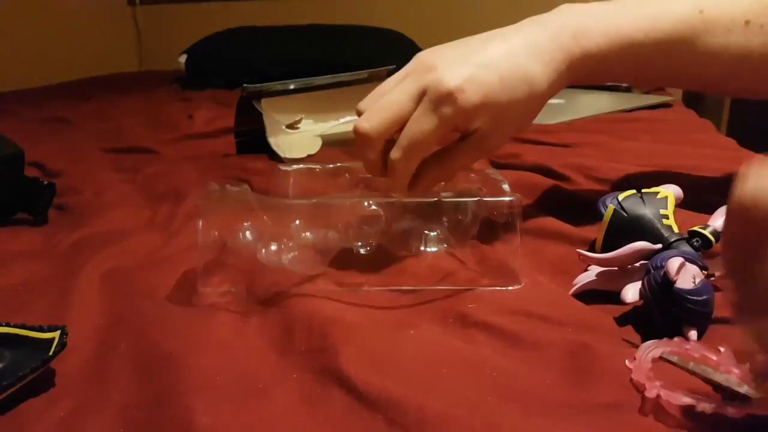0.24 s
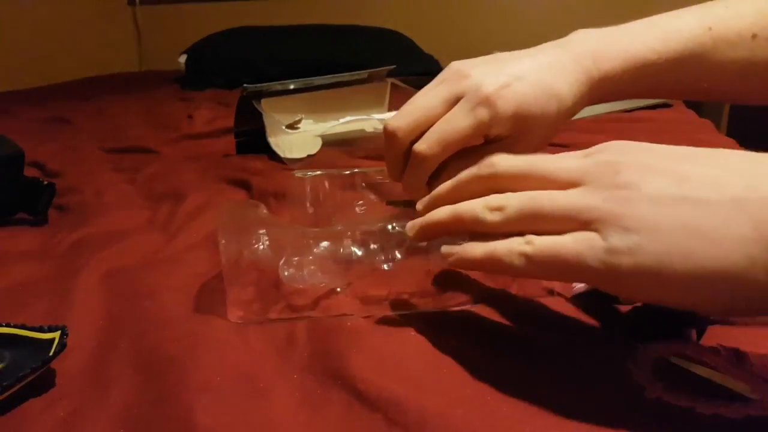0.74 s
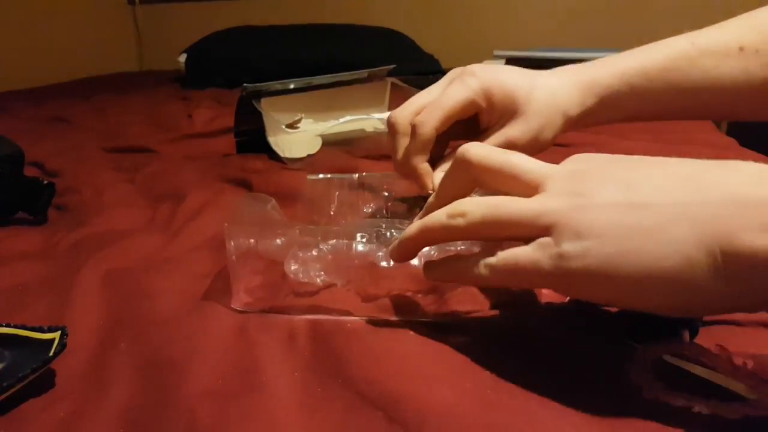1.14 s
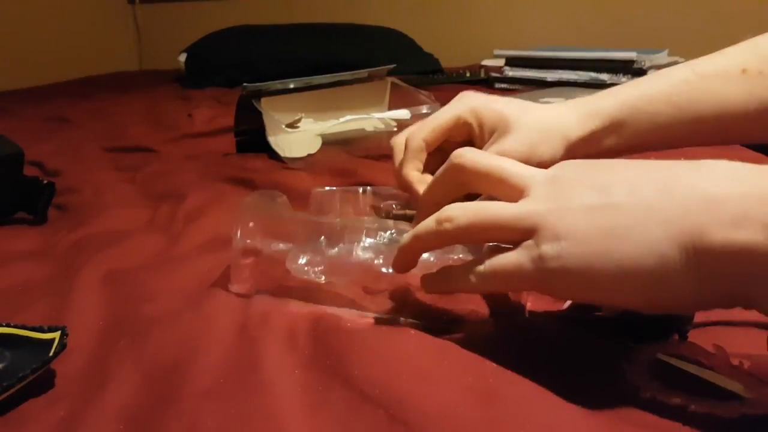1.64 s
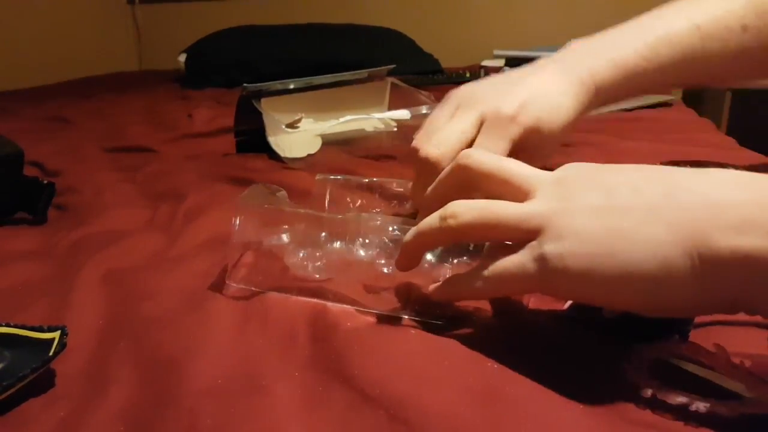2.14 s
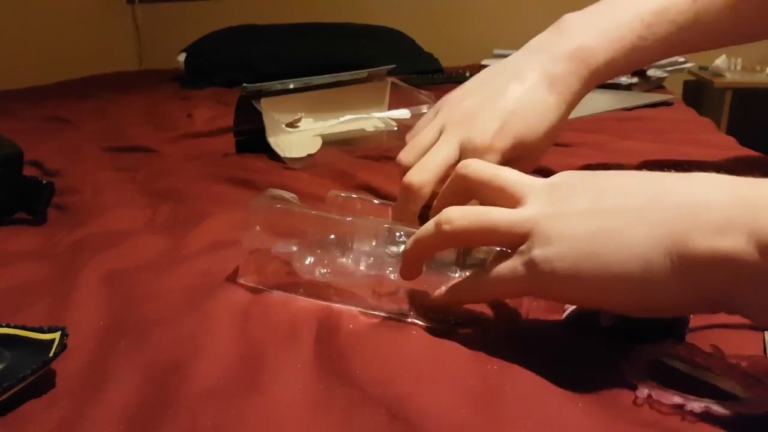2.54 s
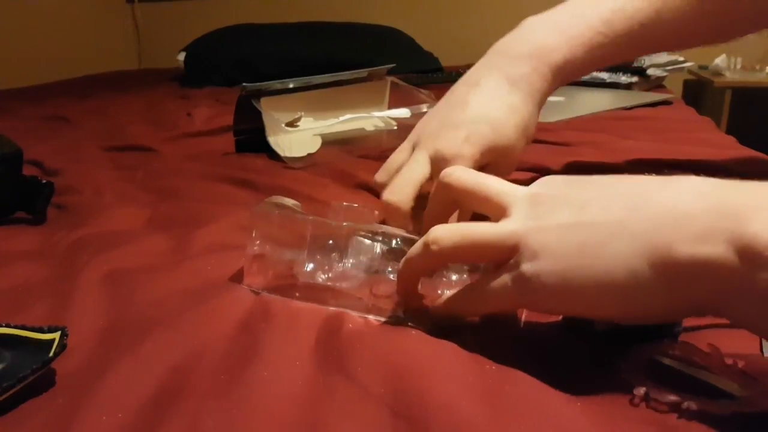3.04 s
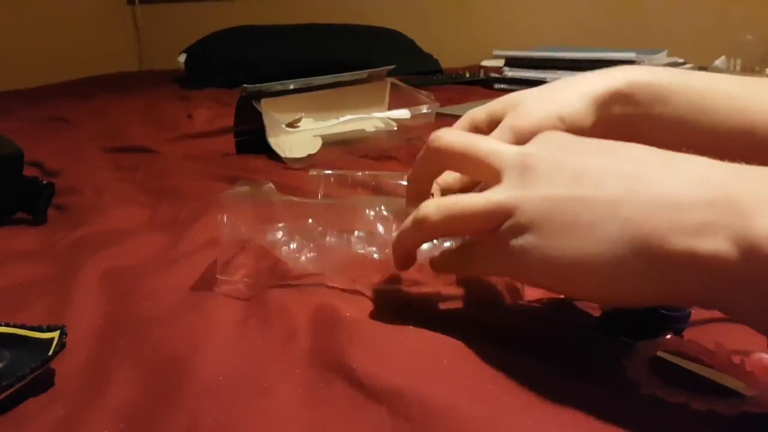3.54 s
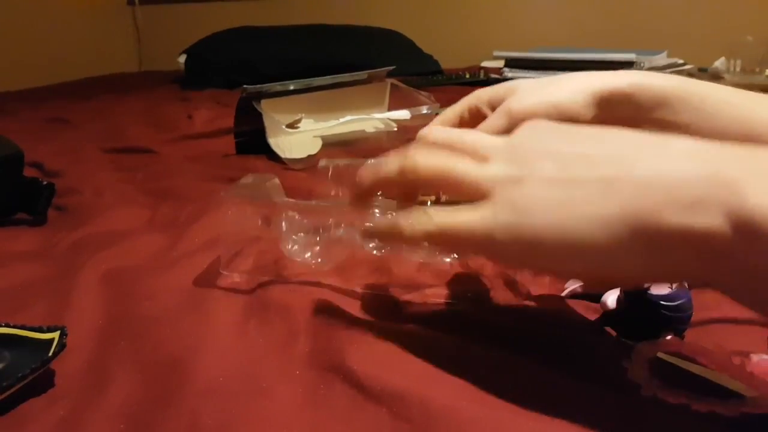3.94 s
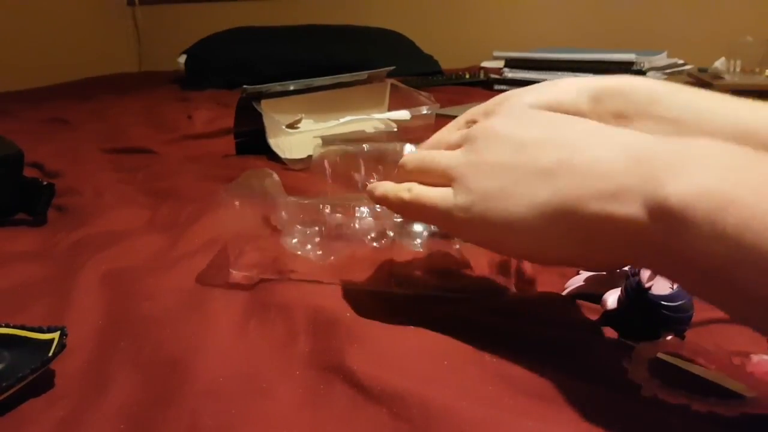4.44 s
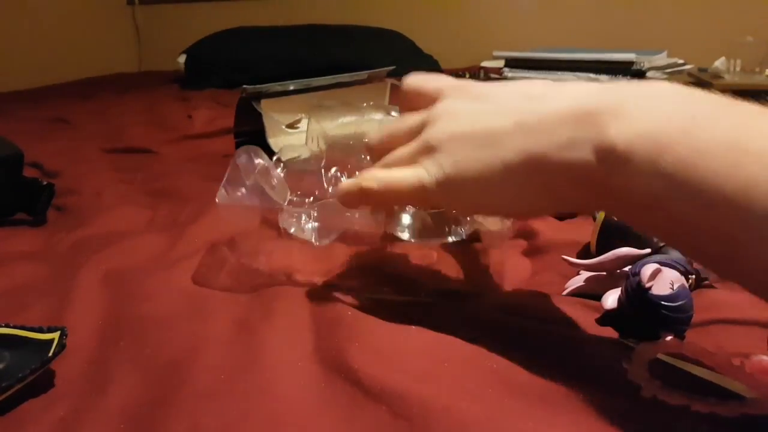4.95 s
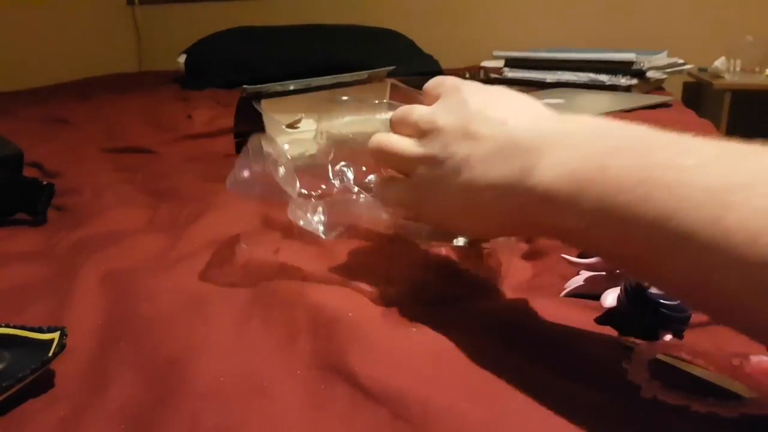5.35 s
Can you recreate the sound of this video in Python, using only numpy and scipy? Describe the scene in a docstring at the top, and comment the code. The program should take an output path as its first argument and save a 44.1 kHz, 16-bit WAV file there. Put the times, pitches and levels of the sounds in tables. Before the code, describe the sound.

Close, dry crackling of thin moulded plastic packaging being squeezed by hand, easing off briefly, then bursting into snaps again.

```python
"""Fingers press and bend a thin moulded plastic tray on a bed, close to a pair of microphones.
Over a quiet hum, hiss and mattress rumble (shaped noise), weak snaps, soft thuds and rubbing come first.
From about 0.7 s harder presses bring dense snaps, each a buckling facet that rings the tray, and tiny crackles.
After 3.4 s it thins out, with rubbing near 4 s; from about 4.4 s the snaps crowd together again until the end.
Thuds are short swelling waves, rubbing is noise, and a small furnished room adds echoes to all of these hand sounds."""
import sys
import numpy as np
from scipy import signal
from scipy.fft import rfft, irfft
from scipy.io import wavfile
from scipy.ndimage import uniform_filter1d

SR = 44100
rng = np.random.default_rng(int(sys.argv[2]) if len(sys.argv) > 2 else 0)


def materialize(psi):
    """Save the field psi as 16-bit PCM at rate SR to the path in sys.argv[1].

    A 1-D psi becomes a single channel; in a 2-D psi each row is a channel.
    """
    bounded = np.clip(np.atleast_2d(psi).T, -1, 1)
    quanta = np.round(bounded * 32767).astype(np.int16)
    wavfile.write(sys.argv[1], SR, quanta)


N = 246783  # length in samples, about 5.6 s

# Steady room hum: (frequency [Hz], relative level per Hz [dB])
HUM_SPECTRUM = [(25, -11), (62, -17), (120, -2), (280, 9.5), (400, -7.5), (650, -1), (1100, -12),
                (2200, -11.5), (4000, -25.5), (8000, -28.5), (10000, -42), (13000, -27.5), (16000, -37)]
# Steady microphone hiss: (frequency [Hz], relative level per Hz [dB])
HISS_SPECTRUM = [(1500, -24), (4000, -4), (9000, -7), (13000, 0), (16000, -1)]
# Low rumble of the mattress: (frequency [Hz], relative level per Hz [dB])
RUMBLE_SPECTRUM = [(25, -26), (60, 12.0), (110, 14.5), (170, 15), (300, -46)]
# How alike the left and right sounds are: (frequency [Hz], likeness [-1 to 1])
LIKENESS = [(60, 0.78), (180, 0.96), (550, 0.57), (1650, 0.45), (4970, -0.33), (15000, -0.14)]
# How much louder the left side of a snap is: (frequency [Hz], left over right [dB])
LEFT_LEAN = [(60, -3.5), (180, -12), (550, 0), (1650, 0), (4970, 0), (15000, 3)]
# Fingers load the tray: (time of hardest push [s], hold [s], load level [dB])
PRESSES = [(0.72, 0.059, -46.5), (0.95, 0.18, -49), (1.27, 0.021, -46.5), (1.43, 0.1, -43.5),
           (1.6, 0.042, -36), (1.72, 0.026, -42), (1.9, 0.021, -33.5), (2.12, 0.49, -53.5),
           (2.5, 0.055, -43), (2.7, 0.02, -41.5), (2.9, 0.07, -46.5), (3.05, 0.11, -46), (3.2, 0.15, -41.5),
           (3.37, 0.01, -37.5), (3.64, 0.013, -46.5), (4.55, 0.023, -39.5), (4.7, 0.02, -31.5),
           (4.85, 0.27, -42.5), (5.05, .03, -44), (5.24, 0.19, -43), (5.44, .04, -40.5)]
# Tray and hands bump the mattress: (time of peak [s], peak level before left-right balance [dB], pitch [Hz])
THUDS = [(0.039, -38.5, 153), (0.677, -56, 60), (0.805, -37.5, 122), (0.914, -41.5, 89), (1.405, -23, 190),
         (1.429, -41, 90), (1.718, -47, 90), (1.848, -17.5, 263), (1.898, -28, 192), (2.152, -43, 120),
         (2.355, -41, 119), (2.396, -46, 80), (2.482, -29, 150), (2.637, -31, 188), (2.747, -46, 90),
         (2.86, -27, 253), (2.905, -41, 90), (3.212, -20.5, 280), (3.827, -41, 150), (3.92, -37.5, 152),
         (3.955, -40, 90.4), (4.544, -36.5, 119.8), (4.673, -25.5, 348), (5.151, -23, 222),
         (5.161, -39.5, 80), (5.246, -41, 69.5)]
# Facets that buckle loudly: (time [s], peak level [dB], facet pitch [Hz], depth [dB], brightness [dB])
SNAPS = [(.0356, -42.5, 298, 8, 10.5), (.179, -46.5, 1790, -6, -24), (.29, -45, 1900, -8, -19),
         (0.361, -40, 584, 7, -30), (.379, -40, 590, 1, -25), (0.4957, -35, 1840, -1, -35),
         (0.7214, -22, 1906, -4, -12.5), (0.7463, -12, 2300, -20, -1), (.795, -14, 1770, -3.5, -18),
         (0.8024, -14.5, 1970, 0, 35), (0.8396, -20.5, 740, -10, -27), (0.8838, -23.5, 1360, -8, -1),
         (0.9131, -19, 1480, -12, 1.5), (0.9459, -34.5, 550, 6, -2), (.9773, -24.5, 2320, -11, -5.5),
         (1.0129, -21, 610, 1, -29), (1.02, -22.5, 460, 8, 5), (1.042, -13, 1670, -16, -3.5),
         (1.0586, -18.5, 1600, -11, -33), (1.091, -20, 1970, -11, -1), (1.0978, -25.5, 770, 15, 17),
         (1.115, -30.5, 550, 5, -20), (1.139, -28, 740, 0.5, -12), (1.1675, -11.5, 750, -15.5, -16.5),
         (1.2089, -14, 1520, -7, -0.5), (1.2252, -23, 1520, -15, 8), (1.248, -27.5, 460, -1, -22),
         (1.2604, -19, 1300, 4.5, 0.5), (1.2714, -19, 760, -19, -13.5), (1.363, -32, 900, 1, -20),
         (1.39, -35, 900, 4, -20), (1.4037, -10.5, 745, -14, -21), (1.4113, -14, 334, 4.5, 9),
         (1.4287, -15, 2030, -15, -13), (1.4453, -22.5, 2110, -23, -32), (1.4882, -24.5, 2160, -15, 2),
         (1.5069, -17.5, 1500, -17, 4), (1.5217, -13, 1300, -3, -12), (1.5491, -22.5, 680, 5, 10),
         (1.565, -16.5, 1450, -16, 0), (1.5866, -5, 745, -12.5, -7.5), (1.6004, -17, 690, -6, 1),
         (1.6087, -10, 3170, 2.5, 10.5), (1.624, -10, 1560, -18, 8.5), (1.6519, -17, 1820, -28, -18),
         (1.6656, -31, 1930, -16, -26), (1.6821, -17, 680, -9, -10), (1.6898, -6, 574, -3.5, -14),
         (1.7182, -16.5, 1900, -16, -3), (1.798, -15, 4900, -5, 7), (1.8061, -23, 2980, -29, 7),
         (1.8449, -6, 438, 2, -10), (1.8688, -9.5, 2215, -25, -12), (1.8858, -22, 5100, -6, 17),
         (1.8938, -9.5, 450, 2.5, -2.5), (1.906, -8.5, 4020, -21, -4), (1.9118, -16, 1654, -13, -5),
         (1.9238, -14.5, 900, -12, 1), (1.9345, -13.5, 2900, -18.5, 0), (1.9464, -16, 2870, -18, 9),
         (1.9685, -9, 2070, -7, -3), (1.9817, -5, 2390, -30, -7), (2.0398, -19.5, 2430, -20, -7),
         (2.1362, -20.5, 761, -5, -16), (2.17, -17, 4240, -22, 3.5), (2.1952, -22.5, 1800, -10, 13),
         (2.235, -28, 1850, -4.5, -3), (2.304, -24, 2470, 0.5, 8), (2.3401, -30, 298, 0.5, 5),
         (2.3508, -24.5, 1290, -2.5, -6), (2.3738, -31.5, 6240, 8, 20), (2.4246, -25.5, 640, -7.5, -11),
         (2.4462, -6.5, 1860, -4, -20), (2.4786, -8, 1500, -1, 9.5), (2.491, -17, 620, 1, 8),
         (2.5279, -19, 1076, -7, -22), (2.555, -27.5, 1110, -5, 11), (2.572, -25, 6100, 6, 17),
         (2.613, -29, 1550, -20, 7), (2.6321, -12.5, 1980, 6, -9), (2.6548, -5, 1660, -12.5, -9.5),
         (2.7055, -32, 1373, -15, -22), (2.7396, -20, 1450, -9, -9), (2.7488, -23, 774, -16, -14),
         (2.76, -30, 1670, -20, -24), (2.7786, -12, 2070, -34, 1.5), (2.788, -26, 1250, -19, -29),
         (2.859, -20, 460, -6.5, -42), (2.885, -28.5, 1590, 3, -2), (2.939, -29, 1460, 5, 16),
         (2.9474, -19.5, 1445, -18, -23), (2.9633, -23, 995, 7, -10), (3.0158, -28.5, 580, 15, 25),
         (3.0551, -24, 1500, -10, -10), (3.0715, -31, 2210, -6, -10), (3.0906, -24, 1420, -4, -26),
         (3.0981, -26, 1360, -11, 32), (3.1132, -22.5, 1440, -17, -17), (3.1322, -25.5, 840, -6, -5.5),
         (3.2016, -23, 1010, -7, -10), (3.2074, -12.5, 305, -4, -8), (3.2158, -17.5, 1710, -5, 8.5),
         (3.262, -13, 1320, -2, -4), (3.2835, -18, 620, -8.5, -21), (3.2939, -12.5, 780, -12, -6.5),
         (3.3531, -13, 2090, -9, -6), (3.3542, -10, 725, -9, 5), (3.3669, -11, 1890, -8, -34),
         (3.397, -5.5, 1500, -10.5, -8.5), (3.5394, -23.5, 1860, -22, 9.5), (3.6225, -19, 1820, -4, 2),
         (3.6421, -17, 5530, 1, 12.5), (3.657, -19.5, 1460, -35, -2.5), (3.8143, -8.5, 1510, -16.5, -11.5),
         (4.095, -37, 843, 0.5, -12.5), (4.4223, -22.5, 2590, -18.5, -8.5), (4.4363, -32, 1870, -8, -6),
         (4.4861, -28.5, 1180, -4, -25), (4.4943, -23, 1960, -39, -4), (4.5241, -16, 1970, -1, -2),
         (4.5327, -3.5, 4200, -10.5, 1.5), (4.546, -17, 4430, -8, 17), (4.6163, -10.5, 2100, -1.5, 0.5),
         (4.6296, -18.5, 1570, 1, -12), (4.6585, -9.5, 1850, -10, -17), (4.6693, -8, 1360, -4, -11.5),
         (4.679, -14.5, 1640, -9, 2), (4.718, -12.5, 1800, -15, -9), (4.7228, -11.5, 1080, 1, -6),
         (4.7422, -22, 1170, -3, 36), (4.7524, -17.5, 1290, -8, 36), (4.763, -17.5, 1650, -17, 7),
         (4.788, -16, 1390, -1, -14), (4.794, -5, 1610, -13.5, -8.5), (4.8044, -12, 770, -9, 4.5),
         (4.8129, -16, 3900, 4.5, 10.5), (4.8392, -18, 1830, -19, -1), (4.8556, -18.5, 1930, -10, 5),
         (4.8652, -10.5, 1640, -13, 4.5), (4.915, -23, 680, 5, 24), (4.9372, -24, 1740, -8, 8),
         (4.9443, -15, 1630, -18, -2), (4.9874, -26.5, 1840, -2, -38), (5.0712, -7, 1650, -2.5, -0.5),
         (5.1514, -31, 296, 7, -11), (5.158, -17, 1620, -1.5, 2), (5.209, -18.5, 1630, -11, 2),
         (5.2349, -27, 646, -6, -5), (5.274, -19.5, 1980, -21, -9), (5.2802, -9, 3170, -15, 4),
         (5.288, -18.5, 3400, -5, 3), (5.336, -19, 1690, 0, -10), (5.34, -11, 1480, -2, 12),
         (5.4048, -17, 2170, -1.5, 0), (5.4105, 0.5, 1345, -8, -13.5), (5.42, -10, 1140, -7, -8.5),
         (5.4257, -22, 1510, -7, -23), (5.4517, -8, 1740, -19, -3), (5.519, -15, 1490, 0, -8.5),
         (5.5516, -24, 1290, -2.5, -2)]
# Centres of boom, hollow, body, sharpness and fizz: (frequency [Hz])
REGION_CENTRES = [280, 680, 1700, 4600, 11000]
# How readily the tray takes a snap in each of those regions: (lift [dB])
REGION_LIFTS = [1.0, 0.057, -1.13, -1.8, -2.2]
# Ringing of the tray before grip and colour alter it: (frequency [Hz], level [dB], time to fall 60 dB [s])
TRAY_MODES = [(240, 3.3, 0.017), (369.6, -2.4, 0.028), (620, -5.5, 0.032), (803, -2, 0.015),
              (1240, -3, 0.011), (1500, -3.5, 0.013), (2018, -4.5, 0.017), (2333, -2.5, 0.0077),
              (3037, 1, 0.0065), (3866, -4.5, 0.0067), (4106, 2, 0.0036), (5530, 4.5, 0.0026)]
# Tearing edge of a fold, heard as a tick: (frequency [Hz], relative level [dB])
TICK_SPECTRUM = [(2500, -36), (3600, -0.9), (6000, 2.5), (8500, -2), (10500, -2), (13000, 1.5),
                 (16000, -5.5)]
# First echoes from nearby surfaces: (delay [s], level [dB])
WALL_ECHOES = [(.0035, -15), (.0082, -22.5), (0.012, -20.5), (0.016, -17.5), (.023, -22.5), (.029, -21.5)]
# How fast the room falls silent: (frequency [Hz], time to fall 60 dB [s])
ROOM_DECAY = [(250, 0.074), (700, 0.24), (1800, 0.19), (4600, 0.27), (12000, 0.25)]
# Skin slides on plastic and cloth: (start [s], hold [s], level before the rubbing mix [dB])
STROKES = [(0.22, .08, -50.5), (0.38, 0.079, -49.5), (0.47, .03, -54.5), (0.54, 0.057, -53),
           (3.88, 0.078, -46.5), (4.12, .01, -55), (4.215, 0.052, -51.5), (4.34, 0.012, -72),
           (4.39, 0.018, -62.5)]
# Colour of the rubbing: (frequency [Hz], relative level per Hz [dB])
RUB_SPECTRUM = [(100, -33), (200, -5.5), (600, 0), (1000, -5.5), (2200, -9), (2700, -16.5), (6500, -26.5),
                (8500, -34.5), (16000, -35)]

HUM_DB, HISS_DB, RUMBLE_DB = -58.5, -75.5, -59.5
RUMBLE_FOLLOWS = 0.26  # share of the load, in dB, that the rumble follows
YIELD_DB = -59  # below this load the tray stops crackling
PRESS_RISE_DB_PER_S, PRESS_FALL_DB_PER_S = 144, 113.5
STROKE_RISE_DB_PER_S, STROKE_FALL_DB_PER_S = 400, 311
SNAP_SAMPLES = 1024  # length of one snap
FACET_CYCLES = 7.0  # cycles in which a facet falls 60 dB
BOOM_DB, BOOM_PER_DEPTH = -11, 1.98  # a deep snap booms as well as sounding hollow
FIZZ_DB, FIZZ_PER_BRIGHT = -12, 1.24  # a bright snap fizzes as well as sounding sharp
FIZZ_SPREAD_DB = 4.5  # fizz also varies by chance from snap to snap
EDGE_HZ = 16000  # upper band limit


def amp(db):
    """Turns decibels into a gain."""
    return 10 ** (np.asarray(db) / 20)


def evened(x):
    """Scales a sound so that its average strength (rms) is one."""
    return x / np.sqrt(np.mean(x ** 2) + 1e-20)


def read(points, hz):
    """Reads a table at any pitch, with straight lines on a log-frequency axis."""
    f, value = np.transpose(points)
    return np.interp(np.log(hz + 1), np.log(f + 1), value)


def likeness(hz, strength=1.0):
    """Left-right likeness at each frequency, kept between -1 and 1."""
    return np.clip(read(LIKENESS, hz) * strength, -1, 1)


def noise(shape, patchy_db, size):
    """Stereo noise of a given spectrum, with patches that drift in time and pitch."""
    hop, hz = size // 4, np.fft.rfftfreq(size, 1 / SR)
    a, b, c, d, patches = rng.standard_normal((N // hop + 5, len(hz), 5)).T
    patches = uniform_filter1d(patches, size=9, axis=0)
    patches = evened(uniform_filter1d(patches, size=9, axis=1))
    same = likeness(hz)[:, None]
    left, other = a + 1j * b, c + 1j * d
    right = same * left + np.sqrt(1 - same ** 2) * other
    level_db = read(shape, hz)[:, None] + patchy_db * patches
    z = np.array([left, right]) * amp(level_db)
    return evened(signal.istft(z, nperseg=size, noverlap=size - hop)[1][:, :N])


def follow(rows, rise_db_per_s, fall_db_per_s):
    """Gain of the strongest gesture at each moment: each rises, holds and falls away."""
    t = np.arange(0, N + 64, 64) / SR
    s, hold, db = np.transpose(rows)[:, :, None]
    rise_db = rise_db_per_s * np.maximum(s - t, 0)
    fall_db = fall_db_per_s * np.maximum(t - s - abs(hold), 0)
    strongest_db = (db - rise_db - fall_db).max(0)
    return amp(np.interp(np.arange(N) / SR, t, strongest_db))


def pressing():
    """Load of the fingers on the tray, as a gain over time."""
    return follow(PRESSES, PRESS_RISE_DB_PER_S, PRESS_FALL_DB_PER_S)


def hum():
    """Quiet room hum: patchy noise spread over many pitches."""
    return amp(HUM_DB) * noise(HUM_SPECTRUM, patchy_db=2.5, size=1024)


def hiss():
    """Steady microphone hiss: noise without patches."""
    return amp(HISS_DB) * noise(HISS_SPECTRUM, patchy_db=0, size=512)


def rumble():
    """Weight shifting on the mattress: lumpy low noise that loosely follows the load."""
    lumpy = noise(RUMBLE_SPECTRUM, patchy_db=3.0, size=2048)
    weight = (pressing() + amp(YIELD_DB)) ** RUMBLE_FOLLOWS
    return evened(lumpy * weight) * amp(RUMBLE_DB)


def thuds(cycles=1.54):
    """Each mattress bump is a push of a cycle or two that swells and dies."""
    out = np.zeros(N)
    for (s, db, hz), start in zip(THUDS, rng.random(len(THUDS))):
        turns = (np.arange(-1500, 3000) / SR) * hz
        before = (turns / (0.24 * cycles)) ** 2
        after = turns / (0.36 * cycles)
        swell = np.exp(-np.where(turns < 0, before, after))
        at = round(s * SR) - 1500
        out[at:at + 4500] += amp(db) * swell * np.sin(2 * np.pi * (turns + start))
    return out * amp([[1.2], [-1.2]])  # a little louder on the left


def regions(hz, colour_db):
    """Level that a snap of this colour gives to each frequency."""
    level_db = np.add(colour_db, REGION_LIFTS)
    return np.interp(np.log(hz + 1), np.log(REGION_CENTRES), level_db)


def ringing(facet_hz, colour_db, facet_db=11.5):
    """The facet rings a few cycles and kicks the tray modes, which the grip detunes."""
    modes = TRAY_MODES + [(facet_hz, facet_db, FACET_CYCLES / facet_hz)]
    hz, db, t60 = np.transpose(modes)
    detune, strength, start, late, side = rng.standard_normal((5, len(hz)))
    is_tray = np.arange(len(hz)) < len(TRAY_MODES)
    hz = hz * (1 + 0.088 * detune * is_tray)
    db = db + 3.0 * strength + regions(hz, colour_db)
    delay = 0.0004607 * abs(late)[:, None]  # the fold spreads over the tray [s]
    t = np.maximum(np.arange(SNAP_SAMPLES) / SR - delay, 0)
    build_up = 1 - np.exp(-t * hz[:, None] / 0.65)
    ring = amp(db[:, None] - 60 * t / t60[:, None]) * build_up
    apart = np.arccos(likeness(hz, 1.79)) * np.sign(side)  # phase between the microphones
    lean = amp(read(LEFT_LEAN, hz) / 2)[:, None]
    phase = 2 * np.pi * hz[:, None] * t + np.pi * start[:, None]
    left = (ring * lean * np.sin(phase)).sum(0)
    right = (ring / lean * np.sin(phase + apart[:, None])).sum(0)
    return np.array([left, right])


def tick(colour_db, tick_db=6.0, tick_t60=0.011):
    """The tearing edge of a fold: a bright noise burst that dies in milliseconds."""
    t, f = np.arange(SNAP_SAMPLES) / SR, np.fft.rfftfreq(SNAP_SAMPLES, 1 / SR)
    fade = amp(-60 * t / tick_t60) * (1 - np.exp(-t / 0.00021))
    burst = rng.standard_normal((2, SNAP_SAMPLES)) * fade
    tilt_db = tick_db + read(TICK_SPECTRUM, f) + regions(f, colour_db)
    tilt_db = tilt_db + np.outer([.5, -.5], read(LEFT_LEAN, f))
    return irfft(rfft(burst) * amp(tilt_db))


def snap(facet_hz, colour_db):
    """One buckling facet: ringing plus tick, scaled so the mean of both sides peaks at 1."""
    out = ringing(facet_hz, colour_db) + tick(colour_db)
    return out / abs(out.mean(0)).max()


def snaps():
    """The facets that buckle loudly, each with its own pitch and colour."""
    out = np.zeros((2, N + SNAP_SAMPLES))
    for s, db, hz, depth_db, bright_db in SNAPS:
        at = round(s * SR)
        boom_db = BOOM_DB + BOOM_PER_DEPTH * depth_db
        fizz_db = FIZZ_DB + FIZZ_PER_BRIGHT * bright_db + FIZZ_SPREAD_DB * rng.standard_normal()
        colour_db = [boom_db, depth_db, 0, bright_db, fizz_db]
        out[:, at:at + SNAP_SAMPLES] += amp(db) * snap(hz, colour_db)
    return out[:, :N]


def walls(x):
    """Single echoes from the nearest surfaces, a little apart at the two microphones."""
    taps = np.zeros((2, 1600))
    for s, db in WALL_ECHOES:
        at = round(s * SR) + rng.integers(-3, 4, 2)
        taps[[0, 1], at] = amp(db) * rng.choice([-1, 1])
    return signal.oaconvolve(x, taps, axes=1)[:, :N]


def room(x):
    """Sparse echoes of random sign that begin after the nearest wall, each band dying at its own speed."""
    taps = np.zeros((2, SR // 2))
    slots = np.arange(240, SR // 2 - 20, 20)  # one echo somewhere in each 20 samples
    at = slots + rng.integers(0, 20, (2, (SR // 2 - 241) // 20))
    np.put_along_axis(taps, at, rng.choice([-1., 1.], at.shape), 1)
    hz, t, z = signal.stft(taps, SR, nperseg=256)
    same = likeness(hz)[:, None]
    z[1] = same * z[0] + np.sqrt(1 - same ** 2) * z[1]
    fade = amp(-60 * t / read(ROOM_DECAY, hz)[:, None])
    tail = signal.istft(z * fade, SR, nperseg=256)[1]
    return signal.fftconvolve(x, tail / np.linalg.norm(tail[0]), axes=1)[:, :N]


def rubbing():
    """Soft rustle: strokes while the hands move about, and a share of the load while they press."""
    strokes = follow(STROKES, STROKE_RISE_DB_PER_S, STROKE_FALL_DB_PER_S)
    level = amp(-3.0) * strokes + amp(-4.5) * pressing()
    return noise(RUB_SPECTRUM, patchy_db=1.8, size=512) * level


def crackle(per_s=260., spread_db=7.5, count=32):
    """Many tiny snaps of mixed size and colour while the tray is under load."""
    size = amp(spread_db * np.minimum(rng.exponential(1, N), 2.5))
    size = size * (rng.random(N) < per_s / SR)  # keep only scattered moments
    kind, out = rng.integers(0, count, N), np.zeros((2, N))
    for k in range(count):
        colour_db = np.array([-8.5, -15.0, 10.0, -4.5, -15.0]) + 8.5 * rng.standard_normal(5)
        grain = snap(1600 * np.exp(0.53 * rng.standard_normal()), colour_db)
        grain = grain / np.linalg.norm(grain)
        moments = (size * (kind == k))[None]
        out += signal.oaconvolve(moments, grain, axes=1)[:, :N]
    load = pressing()
    yielding = np.clip(load / amp(YIELD_DB) - 1, 0, 1)
    return evened(out) * load * yielding


def without_bass(x, hz):
    """Weakens everything below the given frequency."""
    return signal.sosfilt(signal.butter(2, hz, "high", fs=SR, output="sos"), x)


def scene():
    """Tray and bed sounds, dry and through the room, over the hum and hiss."""
    bed = without_bass(thuds() + rumble(), 35)  # cloth soaks up the lowest push
    tray = snaps() + rubbing() + amp(-2.0) * crackle()
    tray = without_bass(tray, 140)  # a small tray radiates no deep bass
    echoes = walls(tray) + room(amp(-6.5) * tray + amp(-9) * bed)
    return tray + bed + echoes + hum() + hiss()


def record(dry):
    """The input rounds off the tallest peaks; then a filter limits the band."""
    over = np.maximum(abs(dry) - .7, 0)
    rounded = dry - np.sign(dry) * (over - .25 * np.tanh(over / .25))
    band = signal.firwin(301, EDGE_HZ, window=("kaiser", 12), fs=SR)
    return signal.oaconvolve(rounded, band[None], "same")


dry = scene()
out = record(dry)
materialize(out)
```